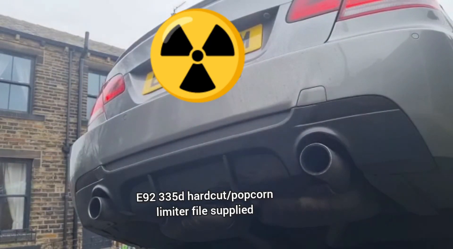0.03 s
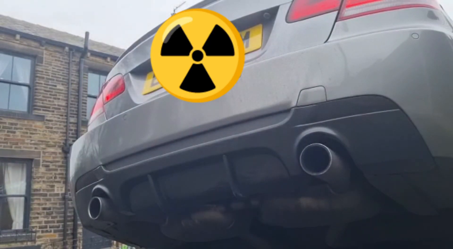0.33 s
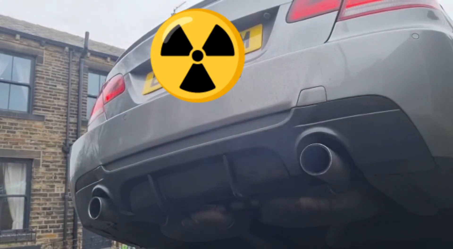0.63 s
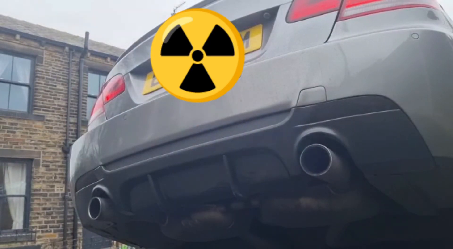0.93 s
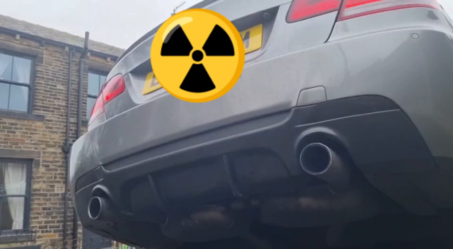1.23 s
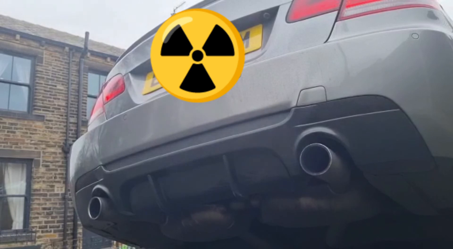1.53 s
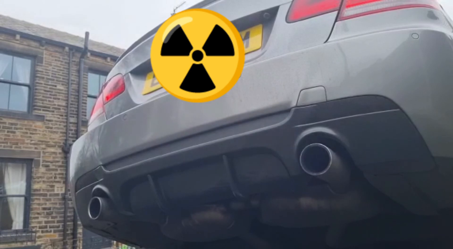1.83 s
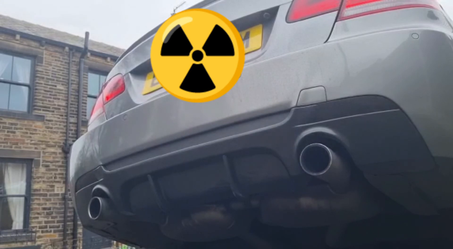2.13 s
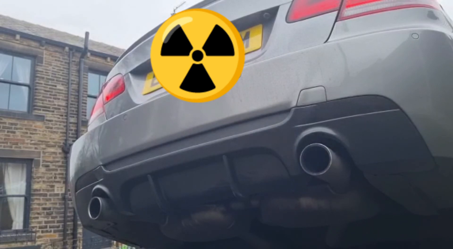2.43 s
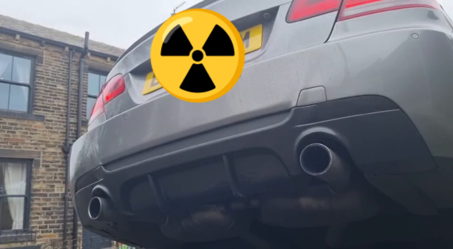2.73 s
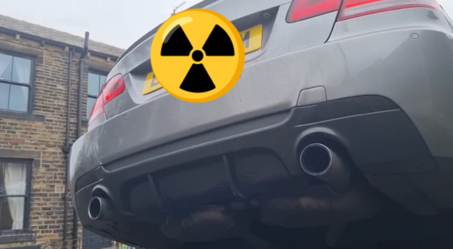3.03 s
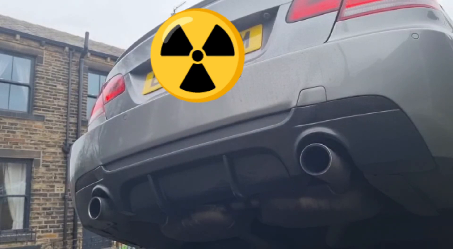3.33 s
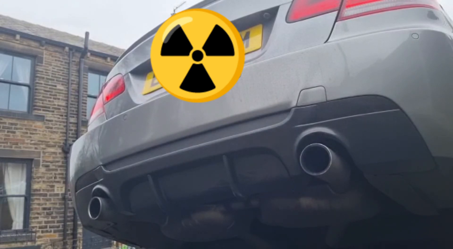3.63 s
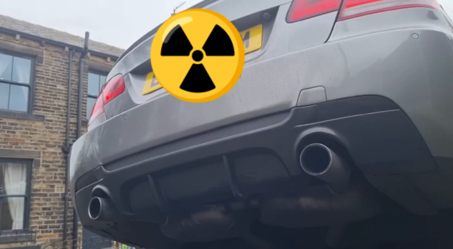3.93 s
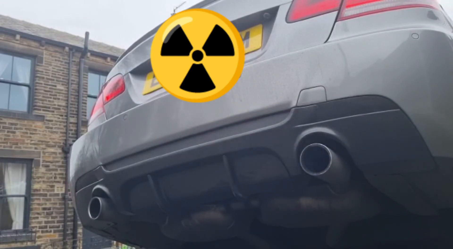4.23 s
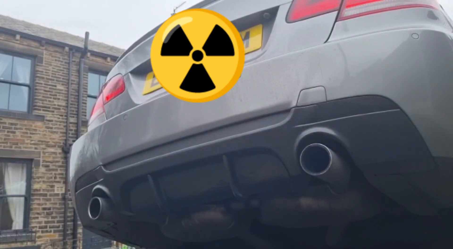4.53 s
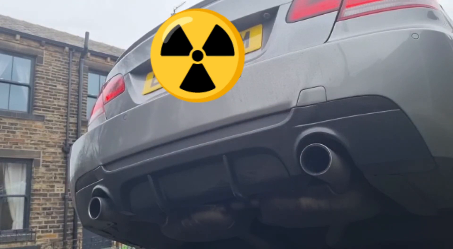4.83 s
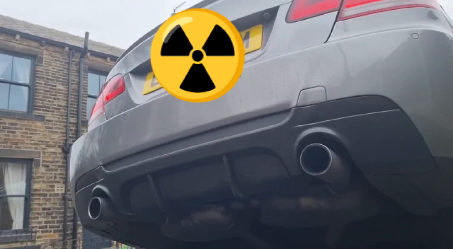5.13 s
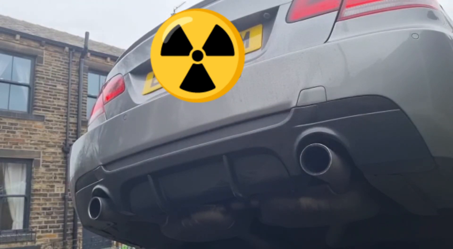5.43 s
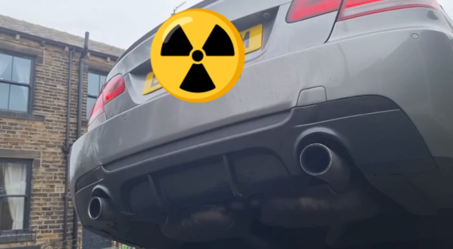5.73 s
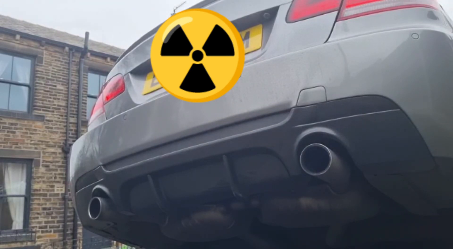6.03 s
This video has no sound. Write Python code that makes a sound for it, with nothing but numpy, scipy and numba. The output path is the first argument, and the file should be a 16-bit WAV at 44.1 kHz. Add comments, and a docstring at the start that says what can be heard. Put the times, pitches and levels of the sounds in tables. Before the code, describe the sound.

A turbo diesel car revs into rapid limiter pops at the exhaust, then winds down to idle with a falling turbo whistle.

```python
"""A yard between house walls, a stereo pair just behind the tailpipes of a six-cylinder turbo diesel.
The firings drone in the exhaust and the gas rings the pipe. A stab of throttle takes the engine into
a hard-cut limiter, where short bursts of fuel bark, crack and thump. Then it coasts down to idle,
with one blip on the way, while the turbo whistles lower and lower. At idle the injectors tick
faintly from the far end of the car."""
import sys
import numpy as np
from scipy import signal
from scipy.fft import rfft, irfft
from scipy.io import wavfile
from numba import njit

SR = 44100
rng = np.random.default_rng(int(sys.argv[2]) if len(sys.argv) > 2 else 0)


def generate_wav(signal):
    """Clip the signal to [-1, 1] and save it as 16-bit WAV at the path in sys.argv[1]."""
    frames = np.transpose(np.atleast_2d(signal))
    scaled = np.clip(frames, -1, 1) * 32767
    pcm = np.round(scaled).astype(np.int16)
    wavfile.write(sys.argv[1], SR, pcm)


N = 277830
TIME = np.arange(N) / SR
CYLINDERS, IDLE_S = 6, 5.1  # idle fuelling starts at IDLE_S


def undb(db):
    """Decibels to gain."""
    return 10 ** (np.asarray(db) / 20)


def unit(x):
    """Scale to rms 1."""
    return x / np.sqrt(np.mean(x ** 2))


def lookup(hz, table):
    """Read each column of a table that starts with f/Hz at the given frequencies."""
    known, *columns = np.transpose(table)
    return [np.interp(np.log(hz), np.log(known), column) for column in columns]


def per_bin(points):
    """Spread (f/Hz, value) points over all frequency bins."""
    return lookup(np.arange(N // 2 + 1) * SR / N + 1, points)[0]


def colour(x, points):
    """Filter x by a curve of (f/Hz, relative level/dB) points and scale to rms 1."""
    return unit(irfft(rfft(x) * undb(per_bin(points)), N))


def noise():
    """White noise."""
    return rng.standard_normal(N)


def walk(rate):
    """Smooth random drift of rms 1 that changes about rate times a second."""
    return unit(signal.sosfilt(signal.butter(N=4, Wn=rate / 2, fs=SR, output="sos"), noise()))


@njit
def bandpass(x, hz, width):
    """State-variable band-pass with a moving centre, gain 1 there."""
    y, band_state, low_state = np.empty(len(x)), 0., 0.
    for i in range(len(x)):
        g, damping = np.tan(np.pi * hz[i] / SR), width / hz[i]
        band = (band_state + g * (x[i] + 1e-18 - low_state)) / (1 + g * (g + damping))
        band_state, low_state = 2 * band - band_state, low_state + 2 * g * band
        y[i] = damping * band
    return y


def ring(x, modes, heat):
    """Sound x through pipe resonances that rise with heat."""
    return sum(undb(db) * bandpass(x, hz * heat, float(width)) for hz, width, db in modes)


def gate(start, length, fall=0.0066, rise=0.002035):
    """An envelope that opens, holds, then dies away; times in seconds."""
    age = np.maximum(TIME - start, 0)
    return (1 - np.exp(-age / rise)) * np.exp(-np.maximum(age - length, 0) / fall)


# standing waves of the whole exhaust, which set a tone's level off the throttle: f/Hz, level/dB
STANDING_WAVES = [(38, -44), (52, -34.5), (63, -43.5), (71, -43), (80, -50), (106, -29.5), (145, -38),
                  (182, -31), (220, -39.5), (275, -32.5), (325, -27.5), (450, -29.5)]
def drone_levels(hz):
    """Firing tone, octave and throb in dB: set by speed and standing waves, the tones lifted by fuel."""
    idle = np.clip((TIME - IDLE_S) / 0.17, 0, 1)
    load = sum(undb(db) * gate(start, length, fall=0.024, rise=.014)
               for start, length, _, _, db in THROTTLE_STABS)
    firing = undb(lookup(hz, STANDING_WAVES)[0] + 5 * idle)
    octave = undb(lookup(2 * hz, STANDING_WAVES)[0] - 10.5 + 13 * idle)
    firing_db = 20 * np.log10(np.hypot(firing, load)) - 0.16
    octave_db = 20 * np.log10(np.hypot(octave, load * undb(-13)))
    throb_db = -35.5 + 13 * np.log2(hz / hz.max())
    return firing_db, octave_db, throb_db


# throb of unequal cylinders: multiple of the four-stroke cycle rate, relative level/dB
THROB_ORDERS = [(2, -0.5), (3, 1), (4, -7.5), (5, -3), (7, -16.5), (8, -6.5), (9, 3), (10, -4.5),
                (11, -2.5), (15, 7), (18, 4)]
# what the silencer lets through of the throb: f/Hz, level/dB
SILENCER_PASS = [(20, -33.5), (45, 7), (65, 4.5), (110, 3), (160, 0.5), (240, -1.5), (345, 5), (450, -6.5),
                 (560, -20.5), (660, -7), (800, -50.5)]
def drone(turns, hz):
    """Pressure waves at the firing rate, their harmonics, and the half orders of unequal cylinders."""
    def partial(multiple, waver_db=1.9, wander=0.1):
        amplitude = np.sqrt(2) * undb(waver_db * np.tanh(walk(16)))
        return amplitude * np.sin(2 * np.pi * (multiple * turns + rng.random()) + wander * walk(22))
    firing_db, octave_db, throb_db = drone_levels(hz)
    tone = undb(firing_db) * partial(1, waver_db=-1.1, wander=0.053) + undb(octave_db) * partial(2)
    richness = np.interp(hz, [37, 39], [1, .15])  # slow, separate puffs are richer in harmonics
    upper = sum(undb(lookup(k * hz, STANDING_WAVES)[0] - 11.5 - 3.7 * (k - 3)) * partial(k)
                for k in range(3, 7))
    throb = 0
    for order, db in THROB_ORDERS:
        silencer_db = np.interp(hz * order / CYLINDERS, *np.transpose(SILENCER_PASS))
        throb += undb(db + silencer_db) * partial(order / CYLINDERS)
    return tone + richness * upper + undb(throb_db) * throb


def puffs(turns, depth_db, lumpy_db, flicker_db):
    """Strength of the gas jet: a puff a firing, stronger from one bank, never twice alike."""
    puff = np.cos(2 * np.pi * turns) + np.sin(4 * np.pi * turns) / 2
    return unit(undb(depth_db * puff + lumpy_db * np.cos(np.pi * turns) + flicker_db * walk(90)))


# gas flow grows with speed, easing near the limiter: firing f/Hz, note level/dB, rasp level/dB
GAS_FLOW = [(33, -43.5, -47), (81.6, -34, -38.5), (118.3, -28, -32), (201, -22, -30), (236, -24, -34)]
# main and upper tailpipe resonances before heat raises them: f/Hz, width/Hz, relative level/dB
PIPE_MODES = [(345, 91, -8.5), (658.5, 28, 11.5), (690.5, 57, 2)]
UPPER_MODES = [(984, 30, -8.5), (1051, 15, 1), (1398.6, 35, 3), (1580, 88, -17.5), (1790, 110, -3.5),
               (2078, 74, 2.5), (2336, 83, -0.5), (2650, 120, -2), (2790, 76, -5.5), (3137, 330, -4.5),
               (3414, 41, 1.5), (3630, 47, -4.5), (4560, 17, -10.5)]
# gas noise close to the tips, darkest to brightest: f/Hz, relative level/dB
GAS_RUMBLE = [(25, -4.5), (60, -3), (200, 4), (400, 5.5), (550, -2), (800, -6.5), (1050, -36.5),
              (2000, -57)]
GAS_RASP = [(500, -32), (900, 4), (1500, 12), (2500, 5.5), (3600, -18), (4500, 1), (6500, -57.5),
            (8500, -21), (11000, -63), (16000, -42)]
TIP_HISS = [(3000, -3), (5000, 10.5), (7000, 8), (9500, -9.5), (11500, -25.5), (16000, -24)]
TIP_SPRAY = [(5000, -7), (8000, -4), (11500, -12.5), (13000, -6.5), (16000, -5.5)]
def coasting_gas(turns, hz, heat):
    """Air pumped through the exhaust rings the pipe and hisses at the tips, right at the microphones."""
    note_db, rasp_db = lookup(hz, GAS_FLOW)
    jet = puffs(turns, depth_db=0.5, lumpy_db=-0.7, flicker_db=0.5)
    note = unit(ring(jet * noise(), PIPE_MODES, heat)) * undb(note_db + 0.46)
    rumble = colour(jet * noise(), GAS_RUMBLE) * undb(0.84 * note_db - 12.5)
    overtones = ring(jet * noise(), UPPER_MODES, heat ** 0.64)
    overtones = colour(overtones, [(400, -36), (900, 16.5), (6500, 0.5), (10000, -57.5)])
    rasp = undb(3) * overtones + undb(-2.5) * colour(jet * noise(), GAS_RASP)
    tips = jet * noise()
    hiss = colour(tips, TIP_HISS) + unit(ring(tips, [(6160, 210, 0)], heat ** .1))
    spray = colour(tips, TIP_SPRAY) * undb(-40) * (hz / hz.max()) ** 6  # needs a fast jet
    return note + rumble + rasp * undb(rasp_db) + hiss * undb(1.147 * note_db - 23) + spray


def whistle(hz, db, blur=0.0052, flutter_db=4):
    """A blade tone fluttering in the turbulent gas, its pitch more blurred at speed."""
    pitch = hz * (1 + blur * hz / 9000 * walk(420))
    flutter = unit(undb(flutter_db * walk(51)))
    return np.sqrt(2) * undb(db) * flutter * np.sin(2 * np.pi * np.cumsum(pitch) / SR)


# turbo whistle, gliding exponentially from point to point: t/s, f/Hz
TURBO_PITCH = [(0, 17000), (.65, 14080), (.9, 17450), (1.55, 17400), (2.25, 12900), (2.85, 9650),
               (3.62, 6820), (3.9, 6670), (4.499, 5460), (5.4, 4057), (6.05, 3334)]
# tailpipe modes that swell the whistle as it slides over them: f/Hz, width/Hz, level/dB
TURBO_MODES = [(3417, 520, -39), (3970, 89, -45), (4537, 460, -44.5), (5450, 340, -57), (6340, 350, -48.5),
               (7810, 780, -60.5), (9700, 1000, -57.5), (13300, 1800, -52)]
def turbo(turns, pulse_db=2.5, floor_db=-57.5, flare_db=-36.5):
    """The turbo, heard down the pipe, pulses with each puff of gas; the last stab makes it flare."""
    times, pitch = np.transpose(TURBO_PITCH)
    hz = np.exp(np.interp(TIME, times, np.log(pitch)))
    swell = sum(undb(db) / (1 + (2 * (hz - centre) / width) ** 4) for centre, width, db in TURBO_MODES)
    start, length, *_ = THROTTLE_STABS[-1]
    flare = gate(start, length, fall=.012) * whistle(hz, flare_db, blur=0.028)
    since_idle = TIME - IDLE_S
    faint = whistle(hz=6570 * np.exp(-.2 * since_idle), db=-68.5 + 7 * since_idle)  # sinks and grows
    main = whistle(hz, pulse_db * np.cos(2 * np.pi * turns), blur=0.00536, flutter_db=2.5)
    return (undb(floor_db) + swell) * main + flare + faint


# the engine block from a car's length away: f/Hz, relative level/dB
BLOCK_RUMBLE = [(40, -22), (110, 3), (190, 4.5), (320, -0.5), (500, -14), (1200, -34.5)]
def engine_block():
    """Steady mechanical rumble that reaches the microphones under the car."""
    return undb(-48.5 + 1.5 * walk(14)) * colour(noise(), BLOCK_RUMBLE)


# stabs of the throttle: t/s, length/s, bark level/dB, crack level/dB, firing tone level/dB
THROTTLE_STABS = [(.552, 0.21, -16, -21.5, -22.5), (3.677, 0.029, -31, -26.5, -20),
                  (3.705, .059, -21, -22.5, -18.5)]
# bursts of fuel that the limiter lets through: t/s, length/s, relative level/dB
LIMITER_POPS = [(.789, 0.031, -1), (0.863, 0.025, -0.5), (0.944, 0.032, -1.5), (1.029, 0.024, -0.5),
                (1.104, 0.02514, -2), (1.165, 0.027, 0), (1.224, 0.01575, 0.5), (1.284, 0.0222, 0),
                (1.342, 0.029, -15)]
# the roar in the pipe and the crack at its tip: f/Hz, relative level/dB
PIPE_BARK = [(60, -0.5), (150, -10), (380, 3), (560, 1), (800, -2.5), (1050, -10), (1450, -10),
             (2200, -41.5), (4000, -38)]
TIP_CRACK = [(500, -31), (950, 4), (2000, 5), (2900, 2.5), (3700, -1.5), (4800, -17.5), (7000, -21.5),
             (9000, -50), (15000, -60.5)]
def fuel_bursts(turns, hz, heat, pop_bark_db=-10, pop_crack_db=-22.5):
    """Each stab or pop gives hard firings that bark in the hot pipe and crack at the tip, close up."""
    jet = puffs(turns, depth_db=0, lumpy_db=2, flicker_db=1.86)
    # the firings swing the pipe's main note with a restless phase; the steepened wave adds its octave
    phase = 2 * np.pi * np.cumsum(660 * heat) / SR + 0.81 * walk(110)
    note = np.sqrt(2) * (np.sin(phase) + undb(-16.5) * np.sin(2 * phase))
    note *= undb(-70 * np.maximum(heat - 1.15, 0))  # at full heat the note breaks up into roar
    bark = unit(note + colour(jet * noise(), PIPE_BARK))
    bark = unit(np.tanh(0.41 * bark))  # the flow chokes at its peaks
    sizzle = undb(-10) * colour(jet * noise(), TIP_HISS) + undb(-26) * colour(jet * noise(), TIP_SPRAY)
    sizzle *= (hz / hz.max()) ** 3  # needs high revs
    crack = colour(jet * noise(), TIP_CRACK)
    pops = [(start, length, pop_bark_db + db, pop_crack_db + db) for start, length, db in LIMITER_POPS]
    out = 0
    for start, length, bark_db, crack_db, *_ in pops + THROTTLE_STABS:
        out += gate(start, length) * (undb(bark_db) * bark + undb(crack_db) * crack)
        # the jet takes a moment to break up
        out += gate(start + 0.009, length * 0.88, fall=0.0051) * undb(crack_db) * sizzle
    return out


def pipe_heat(hz, rise=.3, lag_s=.05):
    """Factor on the pipe's resonances: it lags the rate of fuel burnt; sustained fuel counts most."""
    fuel = sum(gate(start, length) for start, length, *_ in THROTTLE_STABS + LIMITER_POPS)
    keep = np.exp(-1 / (lag_s * SR))
    warmth = signal.lfilter([1 - keep], [1, -keep], fuel * hz / hz.max())
    return 1 + rise * warmth ** 1.5


def thump(start, length, boom_hz=58, decay_s=0.029):
    """The gas column in the silencer swings as the fuel comes on or is cut, then rebounds."""
    def swing(at):
        age = np.maximum(TIME - at, 0)
        return np.sin(2 * np.pi * boom_hz * age) * np.exp(-age / decay_s)
    return .85 * swing(start) + swing(start + 0.73 * np.clip(length, .015, .036))


def silencer_thumps(hz, pop_db=-13.5, cut_db=-9):
    """A thump for each pop, and one when a stab is cut, that one far heavier at high revs."""
    pops = sum(undb(pop_db + db) * thump(start, length) for start, length, db in LIMITER_POPS)
    cut_times = [start + length for start, length, *_ in THROTTLE_STABS]
    cuts = sum(np.interp(at, TIME, hz / hz.max()) ** 4 * thump(at, 0) for at in cut_times)
    return pops + undb(cut_db) * cuts


# injector ticks from behind the car: f/Hz, relative level/dB
INJECTOR_TICK = [(2000, -5), (5000, -3), (7400, -12.5), (8400, -7.5), (9300, -21.5), (15000, -29)]
def injectors(turns):
    """Once idle fuelling starts, the injectors tick faintly, far off under the bonnet."""
    tick = unit(.25 + np.exp(-(turns % 1) / 0.13)) * undb(2.5 * walk(25))
    fuelling = np.clip((TIME - IDLE_S) * 10, 0, 1)
    return fuelling * undb(-52.5) * colour(tick * noise(), INJECTOR_TICK)


# phase between the microphones: f/Hz, lead of the left/rad
MIC_PHASE = [(400, 0.5), (690, 0.88), (950, -1.9), (1380, -1), (1810, -1.5), (2500, -1.75), (4300, -3),
             (6100, -5), (10000, -9)]
# balance between the microphones: f/Hz, left minus right level/dB
MIC_BALANCE = [(60, -1.5), (150, 0), (300, -4.5), (700, -4), (1200, -4), (2200, -5.5), (4500, -6),
               (8000, -0.5), (14000, -5.5)]
# sound scattered under the car, against the direct sound: f/Hz, level/dB
UNDERBODY_SCATTER = [(50, -23), (150, -17), (300, -11), (700, -13), (1200, -6), (2200, -8), (4500, -5),
                     (10000, -3)]
def yard(direct, scattered, t60=0.21, walls_db=-23):
    """The right microphone is the nearer; scatter under the car differs at the two; house walls echo."""
    share = undb(per_bin(UNDERBODY_SCATTER))
    front, diffuse = rfft(direct), share * rfft(scattered)
    channels = []
    for sign in (1, -1):  # left, right
        tail = noise() * np.exp(-np.log(1000) * TIME / t60) * (TIME > .015)
        echo = undb(walls_db) * rfft(tail / np.linalg.norm(tail))
        heard = (front * (1 + echo) + sign * diffuse) / np.hypot(1, share)
        placement = np.exp(sign * 1j * per_bin(MIC_PHASE) / 2) * undb(sign * per_bin(MIC_BALANCE) / 2)
        channels.append(irfft(heard * placement, N))
    return np.array(channels)


# engine speed, from the limiter down to idle: t/s, firing f/Hz
FIRING_RATE = [(0, 230.3), (.53, 196.6), (.62, 211.1), (.75, 242.8), (1.3, 242.8), (1.4, 227),
               (1.85, 203.5), (2.25, 169.9), (2.76, 129.6), (3.27, 98.65), (3.67, 75.1), (3.75, 93),
               (4.39, 69.3), (5.03, 38.48), (5.47, 34.78), (6.05, 32.35)]
def scene():
    """One crankshaft drives drone, gas and pops, heard from behind the car in the yard."""
    hz = np.interp(TIME, *np.transpose(FIRING_RATE))
    heat = pipe_heat(hz)
    turns = np.cumsum(hz * (1 + 0.004 * walk(51))) / SR  # phase, one turn a firing
    direct, scattered = (
        coasting_gas(turns, hz, heat) + fuel_bursts(turns, hz, heat) + turbo(turns) + injectors(turns)
        for _ in range(2))
    return yard(direct + silencer_thumps(hz) + engine_block() + drone(turns, hz), scattered)


def record(dry, stop_s=6.085, top_hz=15750):
    """The recorder rounds the loudest peaks and cuts the top; the sound stops abruptly."""
    rounded = dry / (1 + dry ** 4) ** (1 / 4)
    running = np.clip((stop_s - TIME) / 0.0031, 0, 1)
    return signal.sosfilt(signal.ellip(10, .2, 80, top_hz, fs=SR, output="sos"), rounded * running)


dry = scene()
out = record(dry)
generate_wav(out)
```